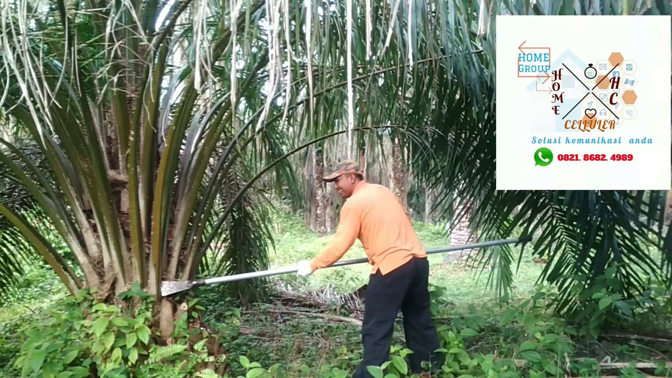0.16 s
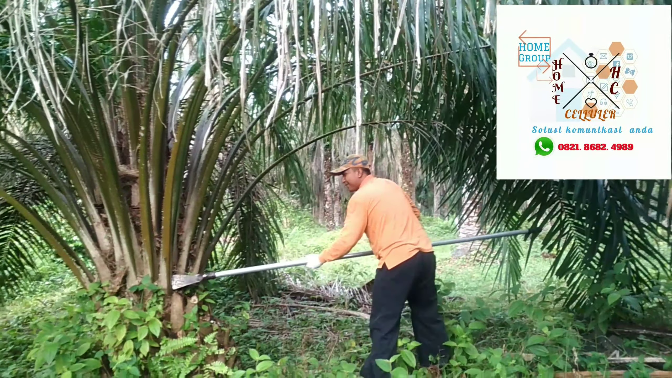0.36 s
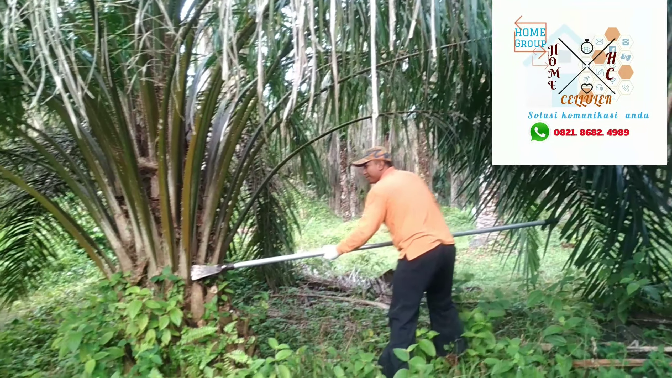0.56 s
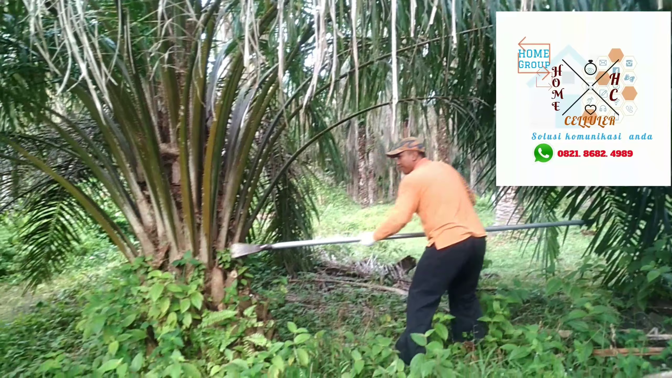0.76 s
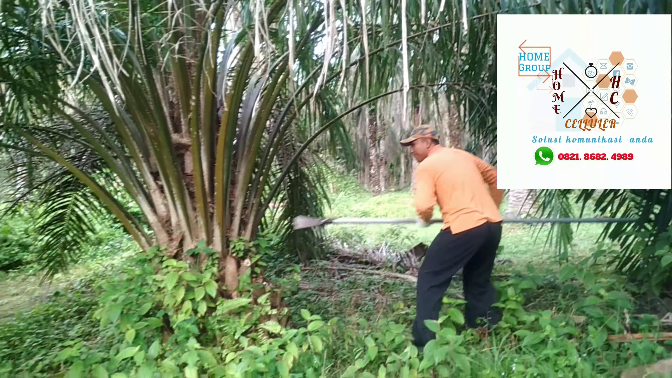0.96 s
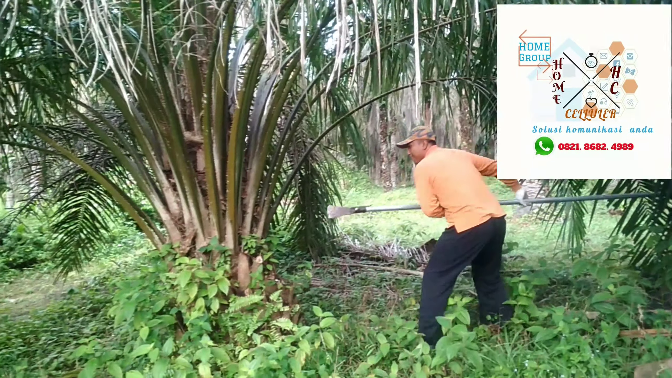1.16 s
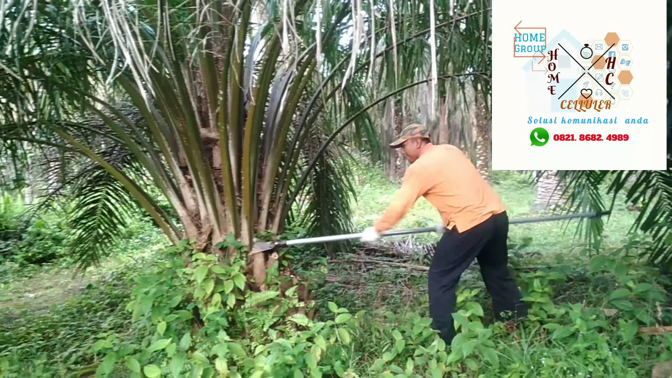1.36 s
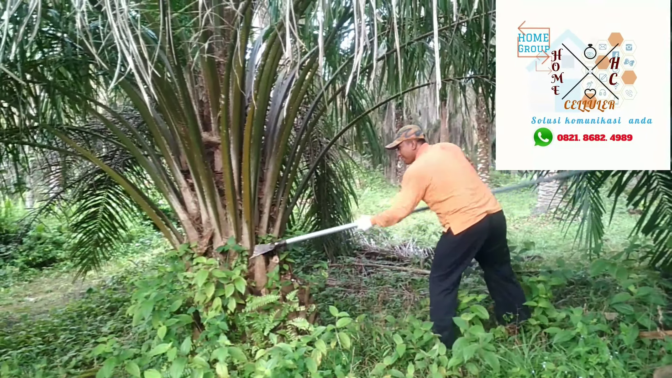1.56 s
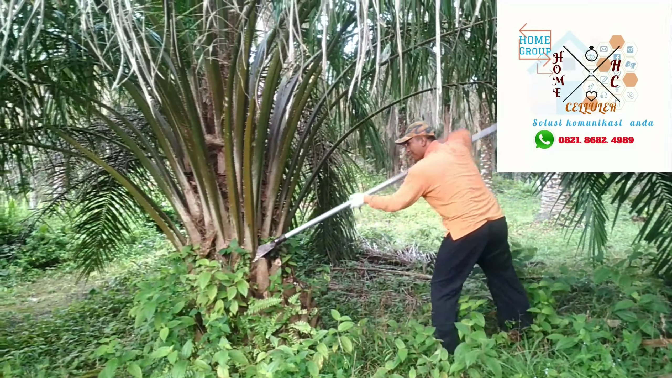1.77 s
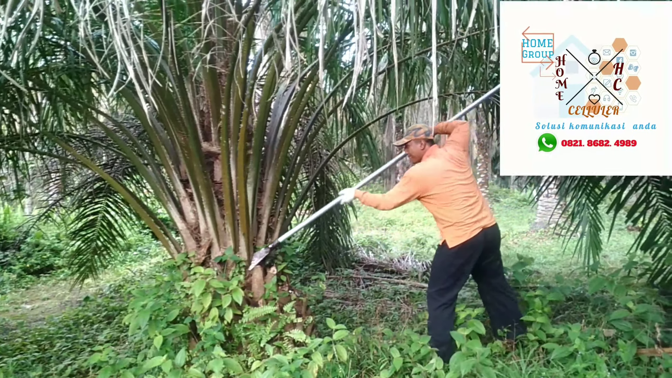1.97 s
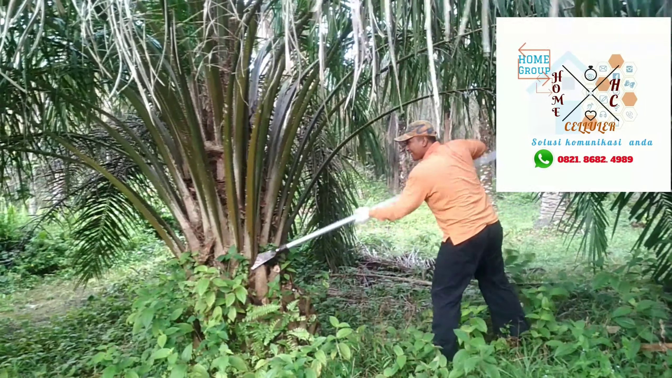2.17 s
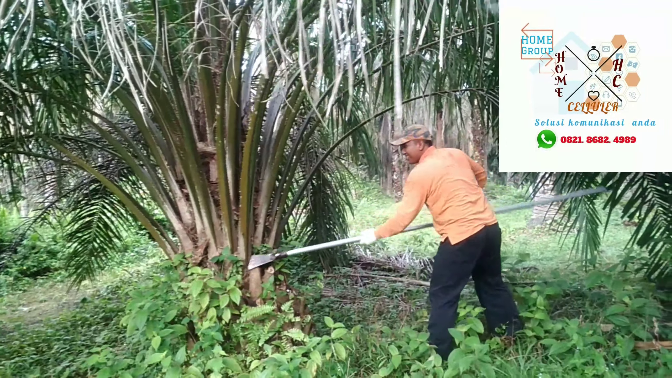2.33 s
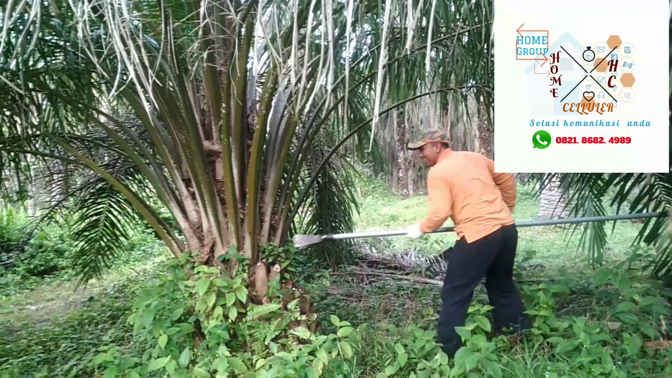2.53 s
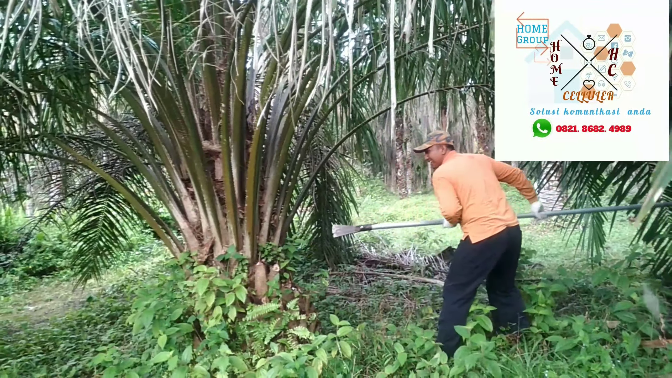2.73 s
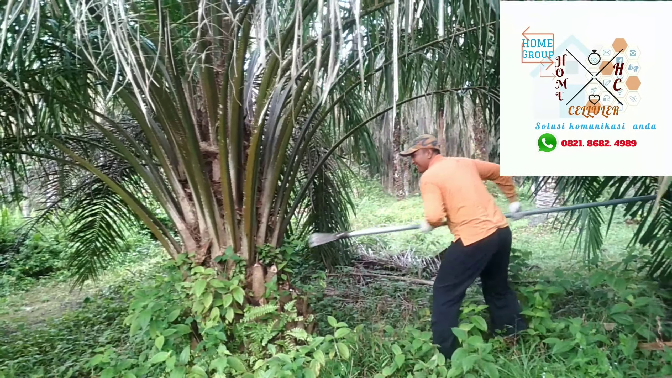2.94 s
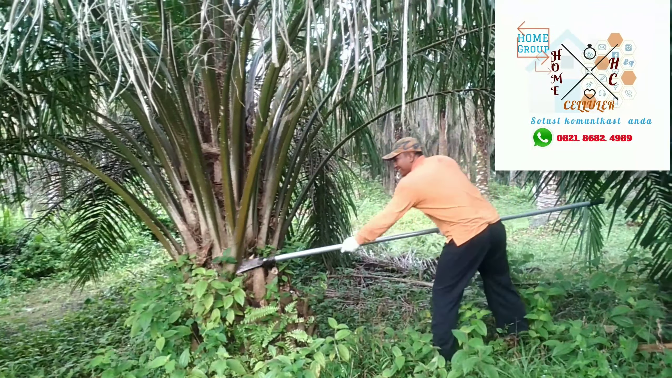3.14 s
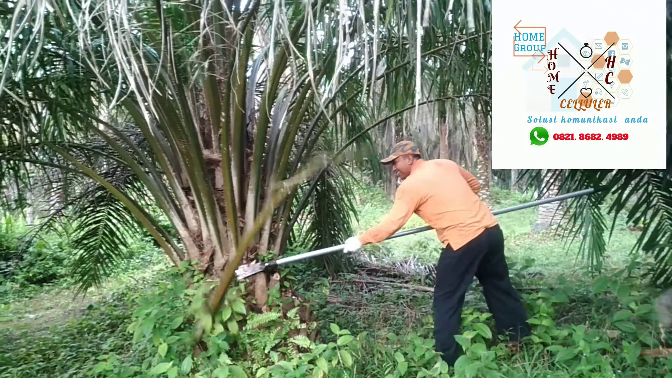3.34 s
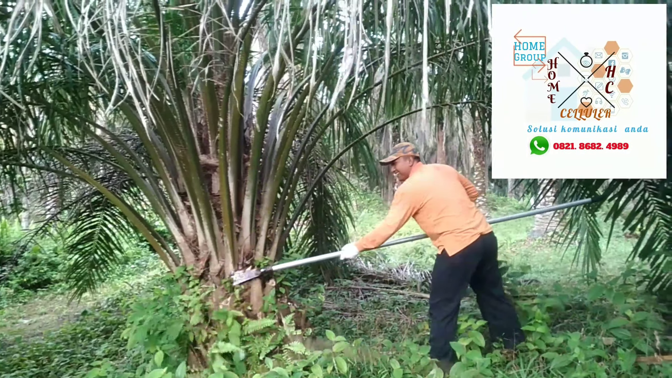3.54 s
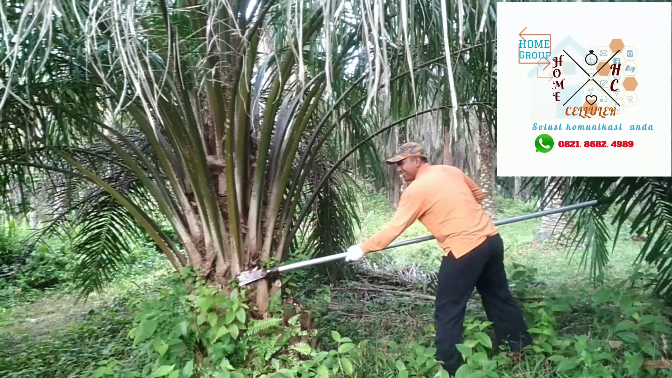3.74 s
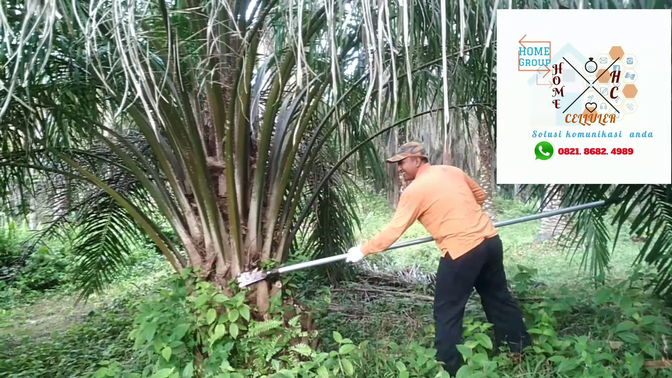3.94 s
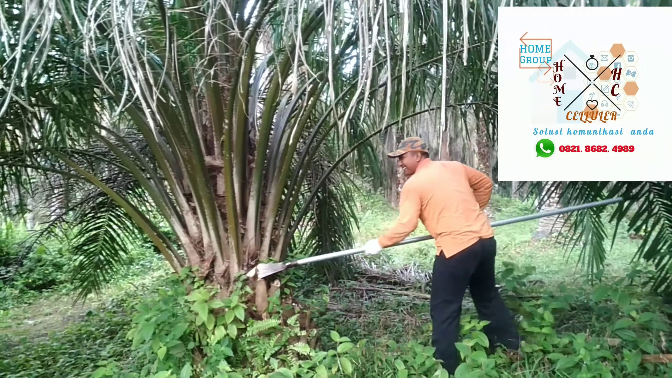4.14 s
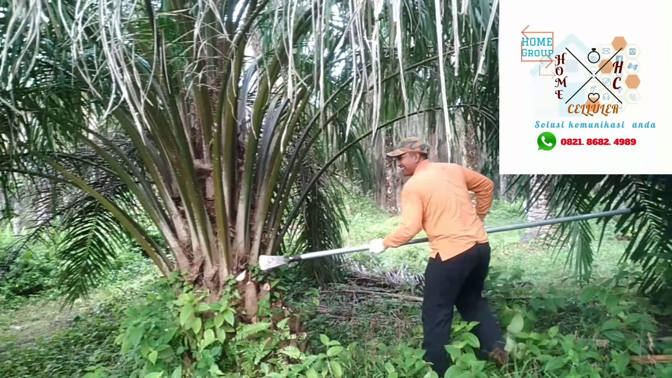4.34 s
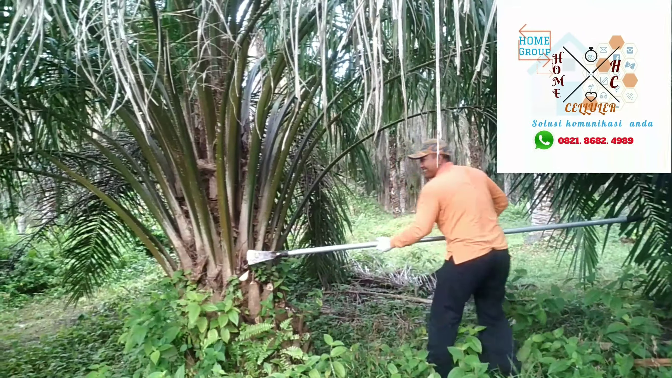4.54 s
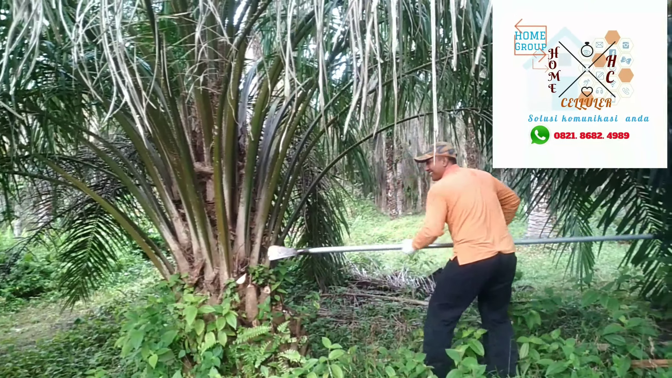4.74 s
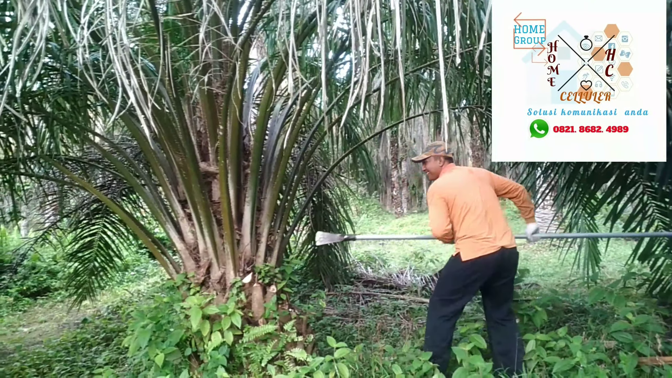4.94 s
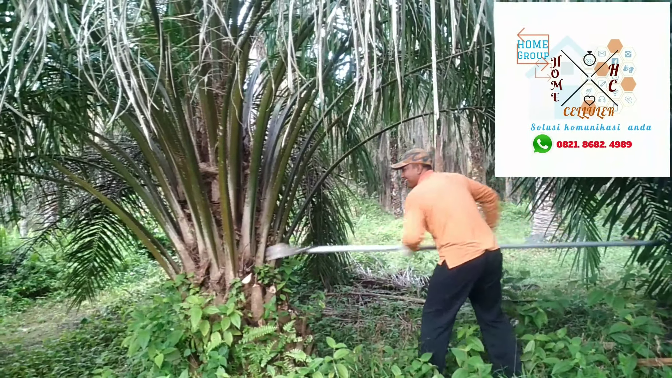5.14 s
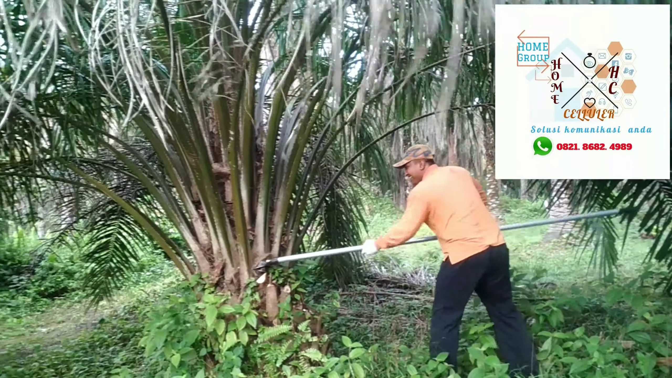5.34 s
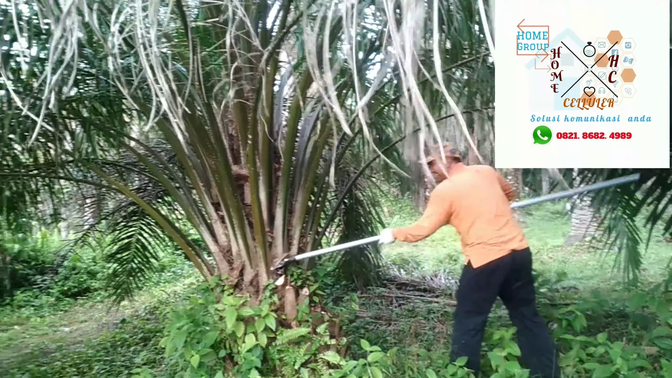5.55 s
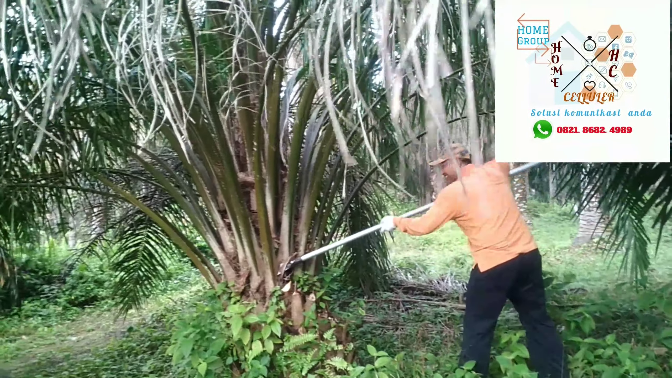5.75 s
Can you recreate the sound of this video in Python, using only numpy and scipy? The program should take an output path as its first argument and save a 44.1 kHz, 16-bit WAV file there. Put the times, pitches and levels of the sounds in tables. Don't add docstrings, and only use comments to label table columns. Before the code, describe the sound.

Outdoors, a blade cracks through fibrous palm stalks three times; a heavy frond drops and slaps the ground amid crisp, crackling leaflets.

```python
import sys
import numpy as np
from scipy import signal
from scipy.fft import irfft, next_fast_len
from scipy.io import wavfile
from scipy.ndimage import uniform_filter1d

SR = 44100
rng = np.random.default_rng(int(sys.argv[2]) if len(sys.argv) > 2 else 0)


def volts(x):
    e = np.asarray(x, float) / 20
    return 10 ** e


def wrap_up_sound(samples):
    columns = np.atleast_2d(samples).T
    tamed = np.clip(columns, -1, 1)
    steps = np.round(tamed * 32767).astype(np.int16)
    wavfile.write(sys.argv[1], SR, steps)


N = 260190
T = np.arange(N) / SR


def evened(x):
    return x / np.sqrt(np.mean(x ** 2) + 1e-20)


def read(points, hz):
    f, value = np.transpose(points)
    return np.interp(np.log(hz + 1), np.log(f + 1), value)


def add(mix, s, sound):
    part = mix[:, round(s * SR):][:, :sound.shape[-1]]
    part += sound[..., :part.shape[1]]


def panned(db):
    return volts([[db / 2], [-db / 2]])


# f/Hz, left-right/dB
PORTS_DB = [(60, -2), (110, 4.5), (200, -0.5), (380, 2), (700, -0.5), (1290, 3.5), (2380, -1.5), (4400, -8),
            (8120, -4), (15000, 1.5)]


def noise(spectrum, same, size=N):
    fft_size = next_fast_len(size)
    hz = np.fft.rfftfreq(fft_size, 1 / SR)
    a, b, c, d = rng.standard_normal((len(hz), 4)).T
    alike = np.clip(read(same, hz), 0, 1)
    left = a + 1j * b
    right = alike * left + np.sqrt(1 - alike ** 2) * (c + 1j * d)
    z = np.array([left, right])
    z *= volts(read(spectrum, hz)) * panned(read(PORTS_DB, hz))[:, 0]
    pair = irfft(z, fft_size)[:, :size]
    return pair / np.sqrt(np.mean(pair.mean(0) ** 2))


def crackle(per_s, spread_db, grain_s, size=N):
    luck = rng.random(size)
    big = np.minimum(rng.exponential(1, size), 2.5)
    breaks = (luck < per_s / SR) * volts(spread_db * big) ** 2
    power = signal.lfilter([1], [1, -np.exp(-1 / (grain_s * SR))], breaks)
    return evened(np.sqrt(power + 0.9 * power.mean()))


def drift(hz):
    steps = rng.standard_normal(int(N / SR * hz) + 2)
    return np.interp(T * hz, np.arange(len(steps)), steps)


def ring(modes, t):
    return sum(volts(db - 60 * t / min(t60, .12)) * np.sin(2 * np.pi * hz * t) for hz, db, t60 in modes)


def patchy(x, depth_db):
    z = signal.stft(x, nperseg=1024)[2]
    field = uniform_filter1d(rng.standard_normal(z.shape[1:]), size=14, axis=0)
    field = uniform_filter1d(field, size=4, axis=1)
    gain = volts(depth_db * evened(field) - depth_db ** 2 / 9)
    return signal.istft(z * gain, nperseg=1024)[1][:, :N]


# t/s, level/dB, rise/s, cutting time/s, t60/s
JABS = [
    (1.5398, -6.5, 0.0048, 0.011, 0.18),
    (3.2125, -9, 0.0055, .035, 0.11),
    (5.3734, -9, 0.0028, 0.018, 0.11),
]
# f/Hz, level/dB per Hz
CRACK_COLOURS = [
    [(59, -52), (100, -7), (243, -5), (334, -10), (629, -4.5), (1020, 0), (1400, -6), (2330, -4),
     (5780, -14.5), (11400, -6), (15600, -16.5)],
    [(59, -36), (100, -7), (276, -10.5), (355, -17), (656, -4), (1000, -3), (1240, -7), (1560, -0.5),
     (4880, -11), (10900, -7), (15600, -13)],
    [(59, -43), (100, -11), (320, -10), (531, -1), (1930, -1.5), (2190, 3), (2380, 0.5), (5910, -13.5),
     (6570, -5.5), (10700, -4.5), (15600, -11)],
]
# f/Hz, left-right likeness
NEAR_LIKENESS = [(60, 1), (180, 0.99), (550, 0.88), (1650, -0.32), (4970, 0.29), (15000, -0.35)]


def jabs():
    out, t = np.zeros((2, N)), np.arange(SR // 2) / SR
    pinged_db = -3
    for (s, db, rise, cut, t60), colour in zip(JABS, CRACK_COLOURS):
        force = np.clip(t / rise, 0, 1) ** 2 * volts(-60 * np.maximum(t - rise - cut, 0) / t60)
        thinned = [(hz, level_db + pinged_db * (300 < hz < 4500)) for hz, level_db in colour]
        tear = noise(thinned, NEAR_LIKENESS, size=len(t)) * crackle(700, 4, .0008, size=len(t))
        add(out, s, volts(db - .7) * force * tear)
    return out


# t/s, f/Hz, level/dB
SPLITS = [(1.5463, 3770, -17), (1.5473, 1030, -10), (1.5475, 1510, -13), (1.5507, 540, -7),
          (1.5529, 2300, -16), (1.5536, 3790, -15), (1.5561, 1060, -15), (1.5568, 1570, -16),
          (1.5581, 2330, -16), (1.5604, 3940, -20), (1.5606, 370, -11), (1.5652, 370, -14),
          (1.5695, 370, -14), (1.5779, 650, -16), (3.218, 2280, -14), (3.2221, 3750, -15),
          (3.2257, 3100, -16), (3.2259, 800, -15), (3.2266, 1680, -15), (3.2316, 1700, -16),
          (3.2382, 690, -16), (3.2382, 2410, -16), (3.2386, 1510, -13), (3.2425, 3660, -17),
          (3.245, 1590, -13), (3.2481, 970, -12), (3.2497, 2200, -17), (3.2525, 500, -15),
          (5.3775, 650, -20), (5.3793, 2710, -12), (5.3809, 1290, -12), (5.3823, 1720, -14),
          (5.385, 650, -16), (5.3852, 2200, -13), (5.3864, 2730, -17), (5.3911, 1570, -18),
          (5.3923, 3420, -17), (5.3957, 2220, -15), (5.3966, 1340, -20), (5.3995, 840, -14),
          (5.4018, 2730, -17), (5.4086, 600, -17)]


def pings():
    out = np.zeros((2, N))
    base_s, cycles, gain_db = .005, 1.5, 2.5
    for (s, hz, db), (phase, lean, lag) in zip(SPLITS, rng.random((len(SPLITS), 3))):
        length = base_s + cycles / hz
        u = np.arange(0, 1, 1 / (length * SR))
        port_turns = [[0], [.22 * (lag - .5) * hz / 1000]]
        turns = hz * length * u * (1.03 - .06 * u) + phase + port_turns
        ping = np.sin(np.pi * u ** .75) ** 2 * np.sin(2 * np.pi * turns)
        add(out, s - .4 * length, panned(3.5 + 5 * (lean - .5)) * volts(db + gain_db) * ping)
    return out


# t/s, start f/Hz, end f/Hz, length/s, level/dB
SWEEPS = [
    (1.551, 303, 186, 0.028, -15),
    (1.583, 220, 170, 0.035, -21.5),
    (1.574, 703, 600, 0.02, -17.5),
    (3.236, 1020, 600, 0.025, -20),
    (3.243, 400, 195, 0.025, -20.5),
    (5.394, 982, 380, .024, -20),
    (5.415, 334, 234, 0.033, -25),
]
SLAPS = [
    (3.789, 260, 220, 0.021, -28),
    (3.829, 270, 240, 0.029, -28),
    (3.844, 217, 170, 0.018, -10.5),
    (3.862, 287, 193, 0.027, -16.5),
    (3.889, 195, 170, 0.015, -23),
]


def stalk():
    out = np.zeros((2, N))
    for s, start_hz, end_hz, length, db in SWEEPS + SLAPS:
        u = np.arange(0, 1, 1 / (length * SR))
        turns = np.cumsum(start_hz * (end_hz / start_hz) ** u) / SR
        wave = np.sin(np.pi * u ** 1.13) ** 2 * np.sin(2 * np.pi * turns)
        add(out, s, panned(1.4) * volts(db) * wave)
    return out


# f/Hz, level/dB, t60/s
BUTT_MODES = [(233, -3.5, 0.054), (310, 0.5, 0.025), (404, 1, 0.022), (600, -3, 0.045), (790, -4, .028),
              (1330, -13, .03), (2700, -17, .03)]
# t/s, level/dB, rise/s
THUD = (3.7173, -1.5, 0.00026)


def thuds():
    out, t = np.zeros((2, N)), np.arange(SR // 4) / SR
    s, db, rise = THUD
    struck = ring(BUTT_MODES, t) * (1 - np.exp(-t / rise))
    hit = -signal.lfilter(*signal.butter(2, 170, "high", fs=SR), struck)
    add(out, s, panned(3.5) * volts(db) * hit / abs(hit).max())
    return out


# t/s, leaflet level/dB, 20 dB fall/s, wood share/dB
JOLTS = [(0.0, -21, .06, -6), (.16, -43, .04, 6), (1.6, -21.5, .135, -4), (3.275, -18, .14, -1.5),
         (3.385, -29, .08, -6), (3.561, -22, .03, -6), (3.737, -19.5, .2, 3), (3.935, -24, .08, -9),
         (4.164, -23.5, .1, -5), (4.2, -33, .05, 13), (4.712, -38, .1, -9), (5.425, -19, .45, 1.5),
         (5.54, -23, .1, -1.5)]
# peak t/s, leaflet level/dB, 20 dB rise/s, 20 dB fall/s,
# wood share/dB
SWAYS = [(.09, -39, .1, .17, 3), (.6, -51, .5, .7, 7), (1.45, -56, .4, .5, 12), (1.78, -35, .15, .19, -1.5),
         (2.04, -46, 1.1, .7, 14), (2.29, -23, .13, .09, 4), (2.38, -29, .65, .33, 2.5),
         (2.7, -35, .25, .22, -4), (2.78, -46, .9, .6, 9), (2.95, -44, .2, .3, 3),
         (3.52, -32.5, .5, .2, -8), (3.7, -25, .45, .05, -4), (3.83, -16.5, .22, .1, -9),
         (3.87, -11.5, .08, .1, -4), (3.902, -17, .06, .04, -7), (4.07, -35, .6, .5, -4),
         (4.245, -33, .07, .12, -4), (4.33, -38, .2, .2, -1), (4.5, -43, .5, .35, 2.5),
         (4.93, -65, .6, .5, 24), (5.28, -48, .2, .1, 9), (5.626, -22, .1, .075, -4),
         (5.76, -35, .2, .35, 4)]


def shaking():
    jolt_rise_s = .024
    still_db, still_wood_db = -56, 6
    moves = [(s, db, jolt_rise_s, fall, wood_db) for s, db, fall, wood_db in JOLTS] + SWAYS
    s, db, rise, fall, wood_db = np.transpose(moves)[..., None]
    t = T[::64]
    power = volts(db - 20 * np.maximum((s - t) / rise, (t - s) / fall)) ** 2
    levels = []
    for under_db, share in [(0, 0), (-1.5, .45), (-10, 1)]:
        moved = (power * volts(2 * share * wood_db)).sum(0)
        still = volts(still_db + share * still_wood_db) ** 2
        levels.append(volts(under_db) * np.interp(T, t, np.sqrt(moved + still)))
    return levels


# f/Hz, level/dB per Hz
LEAF_COLOUR = [(2940, -33), (5000, -14.5), (6560, -13.5), (7570, -0.5), (8410, -4), (10800, 2.5),
               (12700, -1), (14900, -4), (15600, -11.5)]
FIBRE_COLOUR = [(70, -22), (300, -6), (710, -4.5), (1450, -14), (2050, -3), (2890, 0.3), (4150, -1.5),
                (4660, -4), (5330, -5), (7000, -5), (9100, -16), (15400, -120)]
STEM_COLOUR = [(71, -32), (120, -14), (221, -5.5), (447, -9.5), (664, -1), (1140, -0.5), (1250, -1.5),
               (1800, -2), (2340, -7.5), (3960, -120)]
# f/Hz, left-right likeness
CROWN_LIKENESS = [(60, .99), (550, .88), (1500, .22), (5000, .08), (15000, .03)]


def fronds():
    leaf, fibre, stem = shaking()
    rattle = crackle(800, 3.1, .0011)
    fibre_rattle = evened(rattle + .66 * crackle(300, 2.6, .0019))
    leaves = leaf * patchy(noise(LEAF_COLOUR, CROWN_LIKENESS), 2.2) * rattle
    fibres = fibre * patchy(noise(FIBRE_COLOUR, CROWN_LIKENESS), 2.3) * fibre_rattle
    stems = stem * noise(STEM_COLOUR, CROWN_LIKENESS) * crackle(110, 5.3, .005)
    left, right = leaves + fibres + stems
    right_late_samples = 11
    return np.array([left, np.roll(right, right_late_samples)])


# t/s, treble level/dB, fibre level/dB, left-right/dB, length/ms
CUT_LEAFLETS = [(0.4709, -38, -38, -2, 2.3), (0.6361, -38, -37, 1, 3.2), (0.655, -38, -37, -2, 3.8),
                (0.8456, -35, -33, -10, 2.1), (1.6413, -29, -33, -8, 3.0), (1.7341, -23, -32, -12, 1.6),
                (1.767, -32, -34, -6, 3.5), (1.8034, -34, -44, -3, 6.0), (1.8368, -43, -35, -5, 3.5),
                (1.8423, -36, -39, -4, 4.1), (1.9291, -44, -36, -5, 2.7), (1.9416, -41, -38, -7, 5.4),
                (1.9615, -45, -36, -6, 2.3), (2.2858, -26, -19, -5, 3.6), (2.2943, -22, -18, -8, 4.1),
                (2.6265, -41, -35, -9, 4.4), (2.6585, -33, -38, -4, 5.3), (2.7448, -33, -40, -4, 3.0),
                (3.3319, -19, -31, -3, 1.8), (3.4227, -29, -32, -8, 2.4), (3.4362, -29, -45, -9, 5.9),
                (3.4691, -29, -36, -9, 2.8), (3.4846, -28, -40, -11, 4.9), (3.5589, -19, -22, -6, 4.4),
                (3.6317, -24, -31, -3, 5.4), (3.6692, -24, -33, -8, 6.0), (3.722, -19, -19, -5, 6.0),
                (3.7255, -16, -22, -7, 2.1), (3.7435, -17, -27, -4, 6.0)]
FALL_LEAFLETS = [(3.8253, -13, -24, -4, 4.7), (3.9371, -12, -17, -2, 3.2), (3.9405, -17, -24, -4, 6.0),
                 (4.0762, -31, -44, -6, 4.3), (4.0892, -27, -43, -3, 2.5), (4.1107, -28, -42, -7, 2.6),
                 (4.1196, -46, -32, -9, 2.7), (4.1645, -23, -41, -5, 6.0), (4.178, -15, -20, -4, 2.2),
                 (4.2174, -18, -24, -9, 1.9), (4.2523, -16, -34, -7, 1.8), (4.3302, -32, -54, -6, 5.4),
                 (4.396, -52, -33, -9, 2.4), (4.3995, -36, -43, -11, 6.0), (4.4474, -35, -56, -2, 3.0),
                 (4.5152, -33, -42, -3, 2.2), (4.5187, -40, -37, -4, 6.0), (4.5641, -38, -39, -3, 4.3),
                 (4.7163, -34, -48, -4, 5.7), (5.4805, -13, -40, -6, 2.3), (5.4845, -14, -40, -7, 2.0),
                 (5.5349, -20, -30, -2, 5.8), (5.5654, -21, -29, -3, 4.8), (5.5753, -21, -32, 2, 3.1),
                 (5.5983, -19, -21, -6, 2.6), (5.6112, -22, -21, -5, 3.7), (5.6147, -29, -16, -14, 1.7),
                 (5.6232, -37, -15, -13, 2.0), (5.6342, -20, -25, -6, 4.6), (5.6427, -24, -20, -9, 3.5),
                 (5.737, -36, -28, -7, 4.5), (5.7529, -36, -29, -7, 6.0), (5.7933, -34, -36, -5, 3.4),
                 (5.8053, -51, -30, -9, 2.7), (5.8871, -42, -35, -7, 2.7)]
RIBS = [
    (1.135, -32, -33, 3, 2.5),
    (2.3115, -24, -24, 2, 2.5),
    (2.4004, -26, -32, -8, 2.2),
    (3.3664, -16, -22, -8.5, 2.2),
    (3.5263, -25, -35, -10, 4.5),
    (3.5397, -23, -30, -10, 4.5),
    (3.8178, -15, -28, -4, 1.8),
    (4.0232, -24, -31, -11, 3.2),
]
# f/Hz, level/dB per Hz
TWIG_COLOUR = [(700, -22), (1800, -10), (2800, 0), (4200, 0), (6000, -6), (8000, -16), (15400, -40)]


def snaps():
    out, t = np.zeros((2, N)), np.arange(-200, 2400) / SR
    for table, kind_hz in ((CUT_LEAFLETS, 10800), (FALL_LEAFLETS, 10800), (RIBS, 6600)):
        for s, db, low_db, pan_db, ms in table:
            u = 1000 * t / max(ms - .8, .8)
            decay = .93 * volts(-10 * u) + .07 * volts(-60 * t / .09)
            shape = np.where(t < 0, np.exp(-(u / .4) ** 2), decay)
            hz = kind_hz * (1 + .05 * rng.standard_normal())
            colour = [(3000, -36), (.68 * hz, -9), (hz, 0), (1.25 * hz, -5), (20000, -12)]
            for part, part_db in ((colour, db + 5.5 - .8 * ms), (TWIG_COLOUR, low_db + 4.5 - .8 * ms)):
                burst = shape * noise(part, NEAR_LIKENESS, size=len(t))
                burst *= np.linalg.norm(shape) / np.linalg.norm(burst.mean(0))
                add(out, s - .0004 + t[0], panned(pan_db + 3.5) * volts(part_db) * burst)
    return out


# t/s, peak level/dB, f/Hz, left-right/dB
TICKS = [(0.026, -30, 1600, 0), (0.161, -27, 1650, 0), (0.298, -34, 600, 5), (0.352, -21.5, 921, 5),
         (0.389, -29, 431, 3.0), (0.601, -29, 651, 13), (0.628, -27.5, 530, 22), (0.637, -25, 394, 26),
         (0.646, -28, 458, 18), (0.655, -23.5, 416, 24), (0.664, -32, 334, 11.5), (0.689, -23, 340, 22.5),
         (0.713, -32, 431, 13.0), (0.726, -27.5, 437, 26), (0.817, -30, 533, 19), (0.822, -30, 614, 20),
         (0.842, -23, 455, 2), (1.132, -33, 310, 23), (1.289, -31.5, 452, 16), (1.761, -26, 1070, 3.5),
         (1.798, -32, 624, 2.5), (1.948, -24.5, 859, 4), (3.17, -30, 603, -17), (4.712, -32, 1970, 2.5),
         (4.739, -36, 1500, 2.5)]
# t/s, level/dB, f/Hz, t60/s
KNOCK = (4.5407, -21, 240, .018)
# t/s, level/dB, width/s
BUMP = (4.527, -23, .005)


def fingers():
    out, t = np.zeros((2, N)), np.arange(1500) / SR
    housing = ring([(170, -5, .016), (1160, -2.5, .0043), (1640, -7.5, .0074), (2500, -11, .004)], t)
    for s, db, hz, pan_db in TICKS:
        slip = np.cos(2 * np.pi * hz * t) * volts(-60 * t * hz / 4.6)
        tick = signal.lfilter(*signal.butter(1, 260, "high", fs=SR), slip + housing)
        onset = 1 - np.exp(-t / .00037)
        add(out, s + .00163, panned(pan_db) * volts(db + 4) * onset * tick / abs(tick).max())
    s, db, hz, t60 = KNOCK
    tap = volts(db - 60 * t / t60) * (1 - np.exp(-t / .00025)) * np.cos(2 * np.pi * hz * t)
    add(out, s, -panned(26) * tap)
    s, db, width = BUMP
    return out + panned(5.5) * volts(db) * np.exp(-((T - s) / width) ** 2)


# first note t/s, last note t/s, gap/s, level/dB
TRILLS = [
    (.316, .78, .0442, -41.5),
    (2.99, 3.22, .0437, -39.5),
    (4.9785, 5.35, .0455, -39.5),
]
# start f/Hz, end f/Hz, length/s
NOTE = (4000, 3420, .03)


def bird():
    out = np.zeros((2, N))
    high_hz, low_hz, length = NOTE
    t = np.arange(0, length, 1 / SR)
    turns = np.cumsum(high_hz + (low_hz - high_hz) * t / length) / SR
    note = np.sin(2 * np.pi * turns) * np.hanning(len(t))
    for first, last, gap, db in TRILLS:
        for s in np.arange(first, last, gap):
            start = s - length / 2 + .0014 * rng.standard_normal()
            note_db = db - 4.5 * (last - s) / (last - first) + 1.6 * rng.standard_normal((2, 1))
            add(out, start, volts(note_db) * note)
    return out + .25 * np.roll(out[::-1], 700, axis=1)


# f/Hz, level/dB per Hz
GROVE_COLOUR = [(35, -34), (60, -0.5), (110, 4), (173, 2), (248, -5.5), (537, -9.5), (639, -8),
                (713, -19.5), (2120, -16), (2600, -16.5), (3380, -40), (5720, -120)]
# f/Hz, level/dB per Hz
HISS_COLOUR = [(2200, -30), (3250, -16), (3700, -11.5), (4050, -13), (4350, -4.5), (5400, -6),
               (5950, -11.5), (7000, -8), (8300, -18), (9700, -12.5), (11100, -4), (12400, -18),
               (13600, -16), (15700, -22)]
# f/Hz, width/Hz, level/dB
CHORUS = [(4530, 200, -1), (10900, 780, -1.5)]
# f/Hz, left-right likeness
FAR_LIKENESS = [(60, 0.73), (180, 0.42), (550, 0.32), (1650, 0), (4970, 0.083), (15000, 0.0)]


def grove():
    grove_db, hiss_db = -48, -38
    wash = volts(grove_db - 2 + 1.15 * drift(2.9)) * noise(GROVE_COLOUR, FAR_LIKENESS)
    wash += volts(hiss_db - 1 + .68 * drift(8.1)) * noise(HISS_COLOUR, FAR_LIKENESS)
    for hz, width, db in CHORUS:
        band = [(hz - 3 * width, -70), (hz - width / 2, -3), (hz, 0), (hz + width / 2, -3), (hz + 3 * width, -70)]
        swell_db = .9 * drift(6.9) + 2.3 * drift(75)
        wash += volts(hiss_db - 11 + db + swell_db) * noise(band, FAR_LIKENESS)
    return patchy(wash, 1.2)


# t/s, level/dB
WIND = [(0.0, -43), (0.93, -39), (1.02, -50), (1.13, -36), (1.33, -38.5), (2.61, -43.5), (2.92, -52.5),
        (3.27, -39), (3.45, -49), (3.73, -45), (4.37, -47.5), (4.5, -40), (4.58, -34), (4.67, -46.5),
        (5.11, -44), (5.44, -41), (5.9, -44)]


def wind():
    colour = [(3, -30), (8, 3), (25, -10), (38, -17), (60, -31.5), (300, -74)]
    gusts = noise(colour, [(3, .77), (300, .45)])
    return volts(np.interp(T, *np.transpose(WIND)) + 2 * drift(6.5)) * gusts


def scene():
    cutting = jabs() + pings() + stalk() + thuds()
    crown = fronds() + snaps()
    return cutting + crown + fingers() + bird() + grove() + wind()


def starve(x):
    z = signal.stft(x, nperseg=1024)[2]
    power = uniform_filter1d((abs(z) ** 2).sum(0), size=4, axis=1) + 1e-20
    edges = np.cumsum(np.linspace(3, 7, 62)).astype(int) + 50
    relative = power / uniform_filter1d(power, size=70, axis=0)
    depth = np.add.reduceat(relative, edges)[:-1] / np.diff(edges)[:, None]
    depth *= edges[1:, None] ** -.62
    kept = np.where(depth < np.percentile(depth, 12), .02, 1)
    z[:, edges[0]:edges[-1]] *= np.repeat(kept, np.diff(edges), axis=0)
    z[:, edges[-1]:] = 0
    return signal.istft(z, nperseg=1024)[1][:, :N]


def top_cut(x):
    return signal.sosfilt(signal.butter(12, 15620, fs=SR, output="sos"), x)


def record(dry):
    mix = np.clip(starve(dry), -1, 1)
    return top_cut(mix)


dry = scene()
out = record(dry)
wrap_up_sound(out)
```